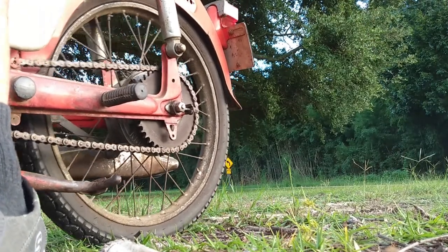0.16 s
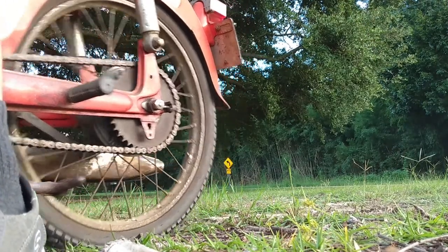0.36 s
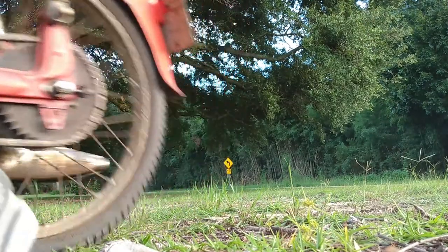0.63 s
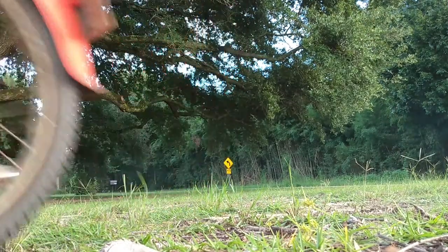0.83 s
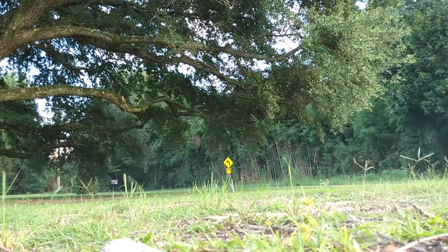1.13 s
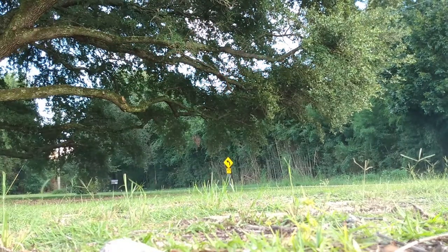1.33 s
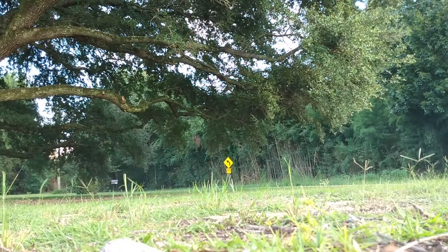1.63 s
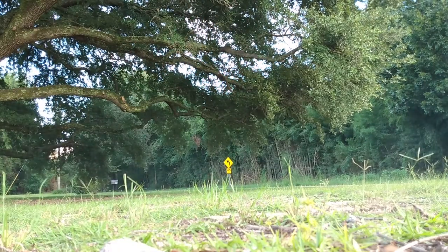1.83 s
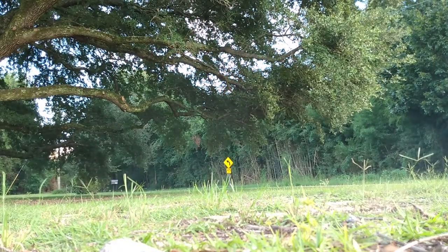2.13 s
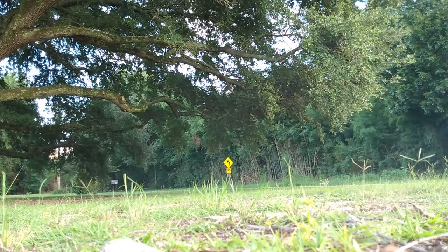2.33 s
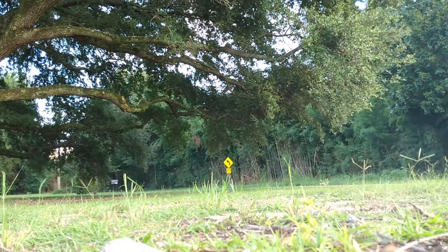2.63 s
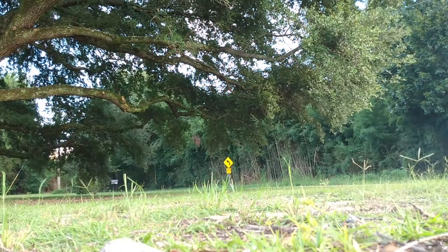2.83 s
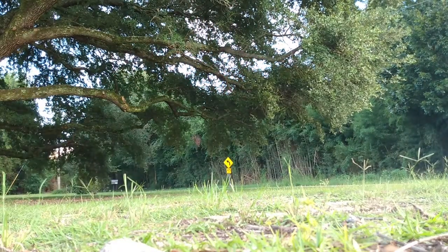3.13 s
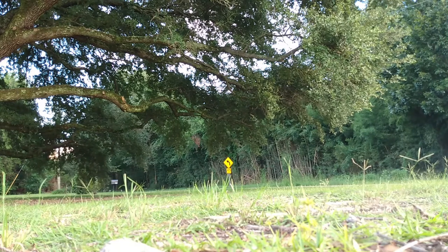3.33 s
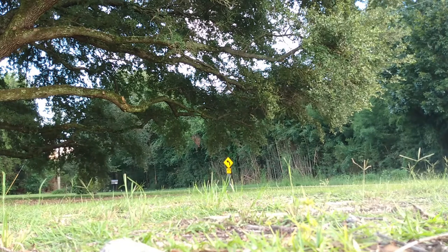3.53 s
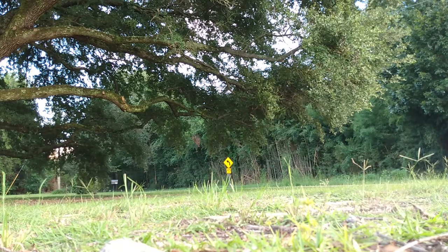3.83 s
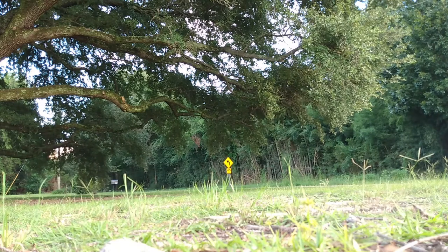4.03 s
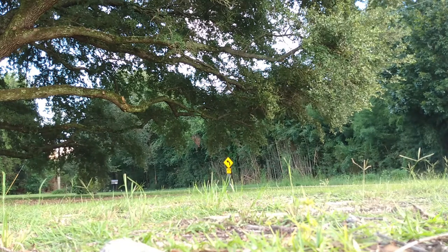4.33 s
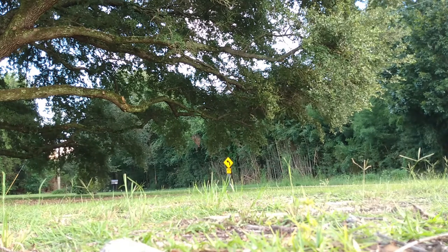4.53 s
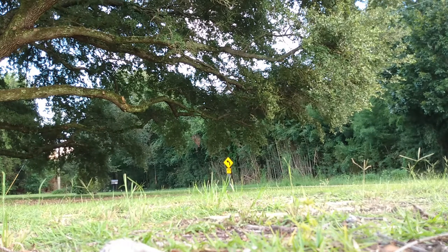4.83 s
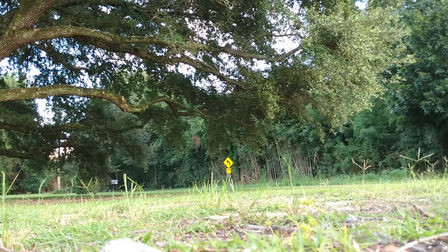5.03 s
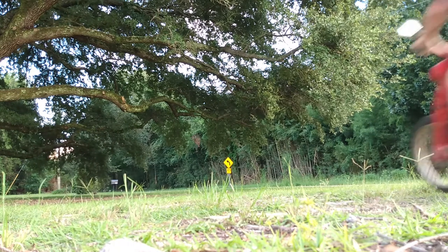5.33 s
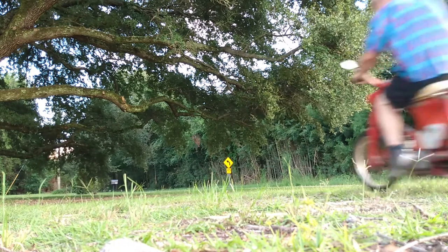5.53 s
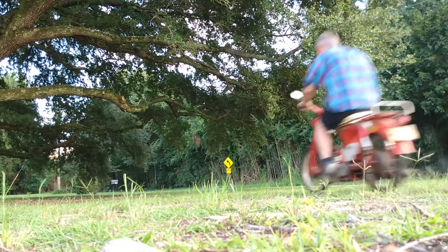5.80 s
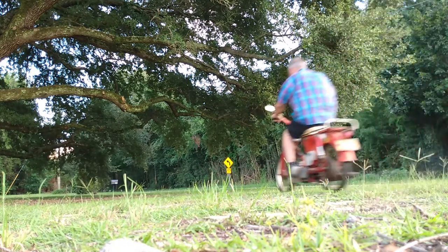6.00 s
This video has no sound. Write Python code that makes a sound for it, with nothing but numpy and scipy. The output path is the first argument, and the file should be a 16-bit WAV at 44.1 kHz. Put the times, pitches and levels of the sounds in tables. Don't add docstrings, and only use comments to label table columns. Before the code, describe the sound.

Outdoors at ground level, a single-cylinder engine chugs very close, its firings quickening into a hollow, buzzing putter as it pulls away. Fin rattle and hissy exhaust thin with distance; a gear whine sings around three seconds, then the throttle drops and the note dulls. A quick cut, and it passes again from the right, loud and rattly, before backfiring in a ragged burst.

```python
import sys
import numpy as np
from scipy import signal
from scipy.fft import rfft, irfft, next_fast_len
from scipy.io import wavfile
from scipy.ndimage import uniform_filter1d, map_coordinates

SR = 44100
rng = np.random.default_rng(int(sys.argv[2]) if len(sys.argv) > 2 else 0)


def unload_audio(sound):
    columns = np.transpose(np.atleast_2d(sound))
    steps = np.round(np.clip(columns, -1, 1) * 32767)
    wavfile.write(sys.argv[1], SR, steps.astype(np.int16))


def magnitude_from_level(level_db):
    exponent = np.asarray(level_db, float) / 20
    return 10 ** exponent


N = 271656
SCENE_CHANGE_S = 4.59


def unit(x):
    return x / np.sqrt(np.mean(x ** 2) + 1e-20)


def steady(x, span_s=0.1045):
    return x / np.sqrt(np.abs(uniform_filter1d(x ** 2, int(span_s * SR))) + 1e-12)


def along(points, hz):
    f, v = np.transpose(points)
    return np.interp(np.log(hz + 1), np.log(f + 1), v)


def curves(rows):
    s, *cols = np.transpose(rows)
    return [np.interp(np.arange(N) / SR, s, c) for c in cols]


def wobble(rate):
    knots = rng.standard_normal(int(N * rate / SR) + 4)
    return map_coordinates(knots, [np.arange(N) * rate / SR])


def filtered(x, response):
    m = next_fast_len(N + SR // 2)
    return irfft(rfft(x, m) * response(np.fft.rfftfreq(m, 1 / SR)), m)[..., :N]


def resonant(x, peaks):
    def bank(f):
        total = 0
        for k, (centre, width, db) in enumerate(peaks):
            peak = 1j * f * width / (centre * centre - f * f + 1j * f * width)
            total = total + (-1) ** k * magnitude_from_level(db) * peak ** 2
        return total
    return unit(filtered(x, bank))


def placed(x, lead_ms, pan_db):
    shift = lead_ms * SR / 2000
    pair = [map_coordinates(x, [np.arange(N) + side * shift], order=3) for side in (1, -1)]
    return np.array(pair) * magnitude_from_level([pan_db / 2, -pan_db / 2])


def facing(pair, centre_hz, width_hz, boost_db, size=256):
    hz, t, z = signal.stft(pair, SR, nperseg=size)
    centre_hz, boost_db = (np.interp(t, np.arange(N) / SR, v + np.zeros(N)) for v in (centre_hz, boost_db))
    near = np.exp(-((hz[:, None] - centre_hz) / width_hz) ** 2)
    return signal.istft(z * magnitude_from_level(boost_db * near), SR, nperseg=size)[1][..., :N]


# time in seconds, firings a second.
LEAVING = [(0, 13.17), (.27, 21.89), (.49, 25.45), (.8, 24.42), (1.02, 25.8), (2.08, 28.63), (2.78, 36.51),
           (2.91, 39.2), (3.06, 40), (3.16, 36.5), (3.73, 45.15), (4.2, 37.25), (4.59, 38.84)]
PASSING = [(4.59, 42.98), (4.79, 40.4), (5.1, 42.6), (5.53, 44.53), (5.73, 43.33), (6.16, 37.49)]


def firing_rate():
    return curves(LEAVING + PASSING)[0]


FIRST_TURN = (.797, .155)


def crank():
    turns = np.zeros(N)
    for rows, first, start in zip((LEAVING, PASSING), FIRST_TURN, (0, int(SCENE_CHANGE_S * SR))):
        turns[start:] = np.ceil(turns[start]) + first + np.cumsum(curves(rows)[0][start:]) / SR
    return np.interp(np.arange(N) + .0049 * SR, np.arange(N), turns)


# time in seconds, throttle opening 0 to 1.
THROTTLE = [(0, .6), (.12, 1), (3.79, 1), (3.87, 0), (4.58, 0), (4.6, 1), (5.79, 1), (5.87, 0)]


def throttle_shut():
    return 1 - curves(THROTTLE)[0]


# time in seconds, how squarely a loaded jet points at the listener 0 to 1.
AIM = [(0, .12), (.9, .2), (1.6, .6), (3, .65), (3.8, .8), (3.86, .1), (4.9, .12), (5.2, .8), (5.79, .95),
       (5.84, .5), (6.16, .5)]


def tailpipe_aim():
    return curves(AIM)[0]


MISFIRES = [3.9, 4.155]
# time in seconds, level in dB.
COASTING = [(5.82, -9), (5.845, 1), (5.867, -5), (5.891, -0.5), (5.915, -0.5), (5.940, -2.5), (5.964, -4.5),
            (5.989, -9), (6.015, -7.5), (6.041, -9.5), (6.066, -13), (6.094, -11.5), (6.122, -16),
            (6.143, -7.5)]


def firings(turns, uneven):
    at = np.flatnonzero(np.diff(np.floor(turns)) > 0)
    luck = rng.standard_normal((len(at), 3))
    late = np.clip(at + (.0012 * SR * uneven[at] * luck[:, 2]).astype(int), 0, N - 1)
    sizes = magnitude_from_level((.3 + 7 * uneven[at]) * luck[:, :2].T)
    coast_s, coast_db = np.transpose(COASTING)
    loaded = late < (coast_s[0] - .012) * SR
    late = np.r_[late[loaded], (coast_s * SR).astype(int)]
    blows = np.zeros((2, N))
    blows[:, late] = np.c_[sizes[:, loaded], [magnitude_from_level(coast_db - coast_db.mean())] * 2]
    for s in MISFIRES:
        blows[:, late[np.argmin(np.abs(late / SR - s))]] *= .35
    return late, blows


def chamber(at, size, modes, note_hz, t60, left, swell_s, crest_s):
    now, left = np.arange(N), np.clip(left, 0, 1)
    last = np.searchsorted(at, now, side="right") - 1
    swell = 1 - np.exp(-((now - at[last.clip(0)]) / SR / swell_s) ** 2)
    out = 0
    for back, gain in enumerate((swell, 1 - swell * (1 - left), left * (1 - swell))):
        k = (last - back).clip(0)
        age, born = np.abs(now - at[k]) / SR, at[k]
        tone = 0
        for share, db, life in modes:
            decay = magnitude_from_level(db - 60 * age / (life * t60[born]))
            tone = tone + decay * np.cos(2 * np.pi * share * note_hz[born] * (age - crest_s[born]))
        out = out + (last >= back) * gain * size[k] * tone
    return steady(out)


# share of its note, level in dB, share of its t60.
BOOM = [(.8, -10, 0.89), (1.004, 12, 1), (1.38, -38, 0.26)]
# time in seconds, note in Hz, t60 in seconds,
# share of the last ring that outlives the next firing.
CHAMBER = [(0, 234, 0.17, .2), (.4, 245.7, 0.2, 0.18), (1.2, 252.4, 0.13, 0.18), (2, 260.5, 0.12, .2),
           (2.7, 259.6, 0.14, 0.13), (3.3, 259, 0.083, .1), (3.8, 265, 0.21, 0.17),
           (3.95, 250, 0.21, 0.097), (4.2, 232, 0.09, .1), (4.58, 219, 0.06, .1), (4.6, 256.5, 0.4, 0.4),
           (5.2, 262.4, 0.12, 0.29), (5.79, 262, 0.22, 0.31), (5.85, 245, 0.056, .05),
           (6.16, 241, 0.026, .05)]


def silencer_boom(at, blows, uneven):
    aim = tailpipe_aim()
    swell_s = .003 * (1 - .6 * aim) * np.interp(uneven, [.2, .5], [.9, .12])
    detour_s = np.interp(aim, [.2, .45], [.001, 0])
    crest_s = .0053 - .00004 * np.clip(firing_rate() - 30, 0, None) + detour_s
    return chamber(at, blows[at], BOOM, *curves(CHAMBER), swell_s, crest_s)


# time in seconds, lower note in Hz, its dB over boom, upper note in Hz, its dB over boom.
LOW_NOTES = [(0, 342, -12, 465, -13), (.3, 384, -19.5, 479, -13), (.8, 372.4, -14, 444, -18.5),
             (1.05, 384, -17, 478, -12), (1.3, 380, -19, 478, -7), (2, 370, -9, 466, -15.5),
             (2.4, 394, -10.5, 489, -2.5), (2.8, 404, -14, 512, -6.5), (3.1, 395, -18, 507, -8.5),
             (3.7, 399, -20, 525, -13.5), (3.9, 390, -18, 481, -14.5), (4.58, 372, -8.5, 473, -29),
             (4.6, 378, -19, 440, -26), (5, 393, -7, 500, -5), (5.4, 427, -17, 530, -5),
             (5.79, 399, -10, 537, -11), (6.16, 395, 0.5, 535, -16)]
# time in seconds, lower note in Hz, its dB over boom, upper note in Hz, its dB over boom.
HIGH_NOTES = [(0, 550, -30, 690, -30), (.3, 520, -13, 690, -12.5), (.7, 590, -26.5, 735, -19),
              (1.3, 570, -50, 698, -17.5), (1.9, 568, -20, 688, -9), (2.5, 526, -35, 685, -11),
              (3, 520, -18, 725, -20), (3.4, 524, -16, 714, -23), (3.75, 554, -12, 740, -20),
              (4, 514, -19, 700, -34), (4.58, 530, -26, 720, -23), (4.6, 567, -9, 660, -31),
              (4.9, 578, -15, 700, -12), (5.2, 528, -14.5, 724, -19), (5.5, 614, -15.5, 742, -8.5),
              (5.79, 580, -8, 740, -4), (5.85, 590, -20, 780, -13), (6.16, 590, -12, 780, -9)]


def pipe_notes(at, blows):
    aim = tailpipe_aim()
    swell_s = np.interp(aim, [.3, .6], (.0022, .0005))
    crest_s = np.interp(aim, [.3, .6], (.0054, .0006))
    notes = curves(LOW_NOTES) + curves(HIGH_NOTES)
    out = 0
    for hz, db, t60_s in zip(notes[::2], notes[1::2], (.22, .22, .085, .085)):
        drifting_hz = hz * (1 + .007 * wobble(12))
        life_s = t60_s * np.interp(aim, [.2, .5], [.5, 1])
        out = out + magnitude_from_level(db) * chamber(at, blows[at], [(0.95, 0, 1)], drifting_hz, life_s, .13, swell_s, crest_s)
    return out


# time in seconds, heat from cool -1 to hot 1.
HEAT = [(0, -1.1), (.4, -0.047), (2, -0.21), (3.8, -0.12), (3.95, -0.22), (4.2, -0.73), (4.58, -0.35),
        (4.6, -0.41), (5.8, 1), (5.9, -2.8), (6.16, -1.1)]


def ring(blows, modes, swell_s, crest_s, heat_drift=0):
    heat = np.clip(np.clip(curves(HEAT)[0], -1, 1) + heat_drift, -1, 1)
    t = np.arange(SR // 6) / SR
    out = 0
    for warmth, scale in ((-0.79, 0.98), (-0.71, 1.1), (1.0, 1.059)):
        shape = sum(magnitude_from_level(db - 60 * t / t60) * np.cos(2 * np.pi * hz * scale * (t - crest_s)) for hz, db, t60 in modes)
        part = np.clip(1 - np.abs(heat - warmth), 0, 1)
        out = out + signal.fftconvolve(blows * part, shape * (1 - np.exp(-(t / swell_s) ** 2)))[:N]
    return steady(out)


# mode in Hz, level in dB, t60 in seconds.
THUD = [(120, -5, 0.021), (142.2, 31, 0.062)]
# time in seconds, level in dB.
BREATH = [(0, 3), (.4, -1.5), (1.2, 1), (1.8, -1.5), (2.5, -2.5), (3.3, -12), (3.8, -2), (3.95, -6),
          (4.1, -0.5), (4.58, 0.5), (4.62, -4), (5, 13.5), (5.5, -1), (5.78, -7), (5.86, 5), (6.16, 1)]


def pipe_thud(blows):
    shut = throttle_shut()
    swallowed_db = 6.5 * tailpipe_aim() * (1 - shut) * np.clip(firing_rate() - 28.2, 0, None)
    level_db = np.maximum(-0.5 - swallowed_db, -14) + 3.5 * shut + curves(BREATH)[0]
    thud = filtered(ring(blows, THUD, .003, .005), lambda hz: (1j * hz / (100 + 1j * hz)) ** 3)
    return magnitude_from_level(level_db) * thud


def slug(blows, push_s, suck_s):
    t = np.arange(SR // 100) / SR - 2 * push_s
    push = -t / push_s ** 2 * np.exp(-(t / push_s) ** 2)
    suck = -t / suck_s ** 2 * np.exp(-(t / suck_s) ** 2)
    return signal.fftconvolve(blows, np.where(t < 0, push, suck))[:N]


# mode in Hz, level in dB, t60 in seconds.
OVERTONES = [(489, 12, 0.019), (690, 5, 0.046), (800, -5.5, 0.074), (991, -0.5, 0.076)]
# delay in ms, level in dB.
ECHOES = [
    (-5.2, -4),
    (-.5, -2),
    (3.9, 0),
    (7.6, -5),
    (11.4, -9),
]


def tailpipe(turns, blows, uneven):
    aim = tailpipe_aim()
    gas = np.exp(-(turns % 1) / .5) * rng.standard_normal(N)
    overtones = ring(blows + (.014 + .06 * uneven) * gas, OVERTONES, .005, .0053, heat_drift=.3 * wobble(5))
    returns = sum(magnitude_from_level(db) * np.roll(blows, int(ms * SR / 1000)) for ms, db in ECHOES)
    echoes = steady(slug(returns, push_s=0.001038, suck_s=0.00063))
    front = steady(slug(blows, push_s=.00055, suck_s=.00055))
    return magnitude_from_level(-6 - 11.2 * aim) * overtones + magnitude_from_level(-4) * (1 - aim) * echoes + magnitude_from_level(2.0) * aim * front


# time in seconds, intake roar in dB, distance in metres,
# jet turned to the listener 0 to 1.
GEAR = [(0, -25.5, 1.15, 0.34), (.25, -23.5, 1.02, 0.51), (.55, -22, 1.1, 0.99), (.85, -21.5, 0.99, 0.8),
        (1.2, -22.5, 1.5, 0.74), (1.7, -26, 2.44, 1), (2.3, -26, 4.36, 0.65), (2.85, -26, 6.9, 0.7),
        (3.2, -26.5, 5.8, 0.62), (3.68, -25.5, 3.9, 0.82), (3.9, -29.5, 6.2, 0.63),
        (4.2, -34.5, 12.4, 0.07), (4.58, -33.5, 38, 0), (4.6, -25.5, 1.9, 0.13), (4.92, -25.5, 1.01, 0.09),
        (5.35, -17.5, 1, 0.57), (5.55, -19.5, 2.3, 0.93), (6.16, -23, 1.8, 0.63)]
# time in seconds, level in dB.
EXHAUST = [(0, -21.5), (.12, -16.5), (.55, -12), (1.5, -13), (2.5, -16.5), (3, -17.5), (3.3, -18),
           (3.5, -20), (3.65, -20), (3.8, -21), (4.16, -22), (4.58, -22), (4.6, -17.5), (4.8, -18.5),
           (5.35, -18.5), (5.5, -17.5), (5.8, -18.5), (6.16, -24.5)]


def exhaust(turns, uneven):
    rate, shut, metres = firing_rate(), throttle_shut(), curves(GEAR)[1]
    at, (boom_blows, pipe_blows) = firings(turns, uneven)
    level_db = curves(EXHAUST)[0] - 2.5 * shut
    pipe_db = -4 - 3 * shut + 3.5 * uneven - 0.006 * metres
    hum_db = -17.5 + .5 * (rate - 25) - 4 * shut
    boom = silencer_boom(at, boom_blows, uneven) + pipe_notes(at, pipe_blows)
    pipe = magnitude_from_level(pipe_db) * tailpipe(turns, pipe_blows, uneven)
    hum = magnitude_from_level(hum_db) * np.sin(2 * np.pi * 2 * turns)
    return magnitude_from_level(level_db) * (boom + pipe_thud(boom_blows) + pipe + hum)


# time in seconds, centre in Hz, level in dB.
GROUND = [(0, 1200, -17), (1, 1070, -8), (1.4, 840, -5), (2.4, 657, -13), (3.4, 776, -13), (3.8, 870, -5.5),
          (4.58, 700, -7), (4.6, 670, -1), (5.2, 890, -1.5), (6.16, 940, -3)]


def over_grass(pipe):
    fast = np.clip(firing_rate() / 10 - 3, 0, 1)
    dip_hz, dip_db = curves(GROUND)
    pipe = facing(pipe, dip_hz, width_hz=185, boost_db=dip_db, size=512)
    pipe = facing(pipe, 301, width_hz=48, boost_db=3.5 * fast, size=1024)
    return facing(pipe, 172.5, width_hz=36, boost_db=-3.5 * fast, size=1024)


def habit(turns, size=400):
    table = uniform_filter1d(rng.standard_normal((int(turns[-1]) + 2, size)), size=7, axis=0)
    return unit(map_coordinates(table, [turns, turns % 1 * size], order=1, mode="grid-wrap")) * 1.6


def patchy(pair):
    z = signal.stft(pair, nperseg=512)[2]
    gains = uniform_filter1d(rng.standard_normal(z.shape[1:]), size=3, axis=0)
    gains = uniform_filter1d(gains, size=30, axis=1)
    return signal.istft(z * magnitude_from_level(1.8 * unit(gains)), nperseg=512)[1][:, :N]


# time in seconds, centre in Hz, length
# in seconds, level in dB.
GLINTS = [(.15, 2930, 0.14, 5.5), (.15, 3820, 0.46, 10.5), (0.44, 3130, 0.15, 7), (0.452, 3750, 0.2, 3),
          (0.504, 4570, 0.6, 6.5), (0.842, 4100, 0.13, 9.5), (0.81, 3300, 0.25, 6), (1.3, 2970, 1, 2.5),
          (2.088, 2600, 1, 12.5), (3.5, 2500, 0.099, 0), (4.693, 2580, 0.11, 6), (4.822, 3600, .07, 5),
          (4.86, 4540, 0.042, 9), (4.917, 4100, .03, 8), (5.026, 2330, 0.19, 15), (5.098, 2800, 0.16, 7.5),
          (5.252, 2600, 0.046, 6), (5.4, 3400, 0.068, 7), (5.53, 3310, 0.16, 12), (5.677, 2790, 0.14, 15),
          (5.883, 2250, 0.14, 4), (1.25, 1810, 0.24, 0.5), (1.904, 1970, 0.41, 5.5),
          (2.1, 1670, 0.077, 2.5), (2.398, 1330, 0.099, -1), (1.4, 1130, 0.13, -1), (2.698, 1010, 1, 7),
          (5.94, 1240, 0.27, -7), (0.536, 1950, 0.1, -5), (3.4, 850, 0.25, -5), (4.35, 3700, 0.28, 11),
          (4.35, 4700, 0.31, 7), (3.646, 1500, .2, 3), (5.063, 880, 0.086, 8), (6.04, 2230, 0.059, 12)]


def glinting(pair, size=256):
    hz, t, z = signal.stft(pair, SR, nperseg=size)
    boost_db = 0
    for s, centre_hz, length, db in GLINTS:
        band = ((hz[:, None] - centre_hz) / 200) ** 2
        boost_db = boost_db + db * np.exp(-band - ((t - s) / length) ** 2)
    return signal.istft(z * magnitude_from_level(boost_db), SR, nperseg=size)[1][..., :N]


# centre in Hz, width in Hz, level in dB.
INTAKE = [(945, 764, 21.5), (1466, 1130, 14), (2108, 854, 12.5)]
FINS = [(2600, 680, 4.5), (2960, 410, 9), (3570, 880, 12.5), (4330, 800, 5), (4670, 320, 11)]
HISS = [(5630, 2700, 8), (7840, 3700, 4), (9910, 2330, 8), (12830, 2200, 3), (15400, 860, -1)]
REPEATS = (.75, .4, 0)
# time in seconds, crack out of the hiss, rattle of the fins.
CRACK = [(0, 1, 0.67), (.5, 2.6, 0.65), (.9, 3.3, 1), (1.2, 4.2, 0.74), (1.8, 12, 2.2), (2.3, 2.6, 4.8),
         (2.9, 0.57, 1), (3.8, 0.44, 0.57), (4.58, .5, .5), (4.62, 0.46, 0.92), (5.2, 0.68, 1.8),
         (5.45, 1, 3), (5.8, 0.84, 1.2), (6.16, 2, 1)]


def running_gear(turns, lead_ms, pan_db):
    roar_db, metres, jet = curves(GEAR)
    rate, shut = firing_rate(), throttle_shut()
    clatter_db = -27 - 20 * np.log10(metres + 0.016) - 2.5 * shut
    hiss_db = clatter_db - 10.5 + 4 * jet + 0.07 * shut * metres
    share = np.clip(jet, 0, 1) * np.clip((37 - rate) / 7, .65, 1)
    cycle = turns % 1
    size = magnitude_from_level(1.45 * rng.standard_normal(int(turns[-1]) + 2))[turns.astype(int)]
    puff = size * np.exp(-cycle / 0.22)
    valves = np.exp(-((cycle - .3) % 1) / 1.5) + np.exp(-((cycle - .86) % 1) / 0.029)
    knock = np.diff(np.floor(turns + .12), prepend=0) > 0
    crack, rattle = np.abs(curves(CRACK)) * size * np.exp(-cycle / .06)
    intake_beat = .5 + 0.51 * rattle + (1.3 + 1.2 * share) * puff + 2.14 * valves
    fin_beat = 0.64 + 3.85 * share * puff + rattle + valves
    jet_beat = .5 + 2 * share * puff + crack + 0.9 * valves
    same = habit(turns)
    layers = ((roar_db - 3.5, INTAKE, .9, 30, intake_beat),
              (clatter_db - 5.5, FINS, .65, 16, fin_beat),
              (hiss_db - 0.5, HISS, .4, 4, jet_beat))
    out = 0
    for repeats, (level_db, peaks, alike, snap, beat) in zip(REPEATS, layers):
        beat = beat * magnitude_from_level(1.66 * wobble(150) + 0.31 * wobble(16))

        def voice(part):
            noise = np.sqrt(1 - part) * rng.standard_normal(N) + np.sqrt(part) * same
            return steady(resonant(beat * noise + .5 * snap * knock, peaks))
        common = placed(voice(repeats), lead_ms, pan_db)
        apart = np.array([voice(0), voice(0)])
        out = out + magnitude_from_level(level_db) * (np.sqrt(alike) * common + np.sqrt(1 - alike) * apart)
    out = facing(out, 1200, width_hz=67, boost_db=1.5)
    shade_db = np.clip(0.12 * (hiss_db + 69.0) - 19 * (1 - jet), -25, 0)
    out = facing(out, 11740, width_hz=2970, boost_db=shade_db)
    out = facing(out, 17500, width_hz=1400, boost_db=-0.5 * np.clip(metres, 0, 8))
    return glinting(patchy(out))


def trees(x):
    t = np.arange(SR // 4) / SR
    scatter = rng.standard_normal((2, len(t))) + 1.75 * rng.standard_normal(len(t))
    tail = scatter * magnitude_from_level(-60 * t / 1.0) * (t > .006)
    return signal.fftconvolve(x[None], tail / np.linalg.norm(tail[0]), axes=1)[:, :N]


# frequency in Hz, level in dB per Hz.
FIELD = [(12, -74), (20, -61), (225, -31), (404, 3.5), (811, -16.5), (1200, -55), (5230, -66),
         (7110, -23.5), (15500, -123)]


def field():
    air = unit(filtered(rng.standard_normal((2, N)), lambda hz: magnitude_from_level(along(FIELD, hz))))
    shaking = rng.standard_normal((2, N)) + 1.9 * rng.standard_normal(N)
    rumble = unit(filtered(shaking, lambda hz: 1 / (1 + (hz / 45) ** 4)))
    rumble = rumble / np.sqrt(curves(GEAR)[1])
    return magnitude_from_level(-37.5 + 0.5 * wobble(5.9)) * air + magnitude_from_level(-28 + 2.5 * wobble(3.44)) * rumble


# time in seconds, level in dB.
LOW_GEAR = [(1.05, -55), (1.2, -31), (1.38, -26), (1.55, -33), (1.8, -55)]
# time in seconds, level in dB.
WHINE = [(1.9, -55), (2.15, -37), (2.75, -38), (2.86, -28), (3.04, -27), (3.1, -20), (3.18, -23),
         (3.3, -31), (3.7, -55)]


def whine(turns):
    out = 0
    for rows, teeth in ((WHINE, 30), (LOW_GEAR, 41.5)):
        level = magnitude_from_level(curves(rows)[0] + 1.5 * wobble(30))
        out = out + level * np.sin(2 * np.pi * teeth * turns + .5 * wobble(40))
    return out


# time in seconds, level in dB, ring in Hz, spit in dB.
POPS = [
    (5.824, -31, 824, -31),
    (5.866, -11.5, 688, -43),
    (5.895, -17.5, 1035, -29),
    (6.014, -22.5, 870, -2),
    (6.031, -13, 800, -21),
    (6.048, -12, 585, -18),
    (6.06, -17.5, 800, -26),
    (6.092, -15.5, 697, -36),
    (6.125, -19, 700, -28),
]
# time in seconds, level in dB, ring in Hz.
CRACKLE = [(5.828, -21, 1470), (5.875, -22, 1400), (5.9006, -9, 1430), (5.9236, -23, 1460),
           (5.9465, -16, 1750), (5.9715, -19.5, 1300), (5.997, -20, 1900), (6.0143, -14, 1790),
           (6.0493, -12, 1450), (6.0712, -28, 1430), (6.0987, -21, 1340), (6.1236, -22, 1460)]


def pops():
    out, t = np.zeros(N + SR), np.arange(SR // 20) / SR
    for s, db, hz, spit_db in POPS:
        jitter = hz / 9000 * np.cumsum(rng.standard_normal(len(t)))
        bang = magnitude_from_level(-60 * t * hz / 45) * np.sin(2 * np.pi * hz * t + jitter)
        spit = magnitude_from_level(spit_db - 60 * t / 0.014) * np.diff(rng.standard_normal(len(t) + 1))
        out[round(s * SR):][:len(t)] += magnitude_from_level(db) * (bang + spit)
    for s, db, hz in CRACKLE:
        jitter = 0.19 * np.cumsum(rng.standard_normal(len(t)))
        spark = magnitude_from_level(db + 1 - 60 * t * hz / 18) * np.sin(2 * np.pi * hz * t + jitter)
        out[round(s * SR):][:len(t)] += spark
    return out[:N]


# time in seconds, unevenness 0 to 1.
UNEVEN = [(0, .16), (.4, .09), (1.2, .07), (3.8, .06), (3.88, .3), (3.98, .18), (4.18, .18), (4.24, .07),
          (4.58, .07), (4.62, .08), (5.79, .07), (5.83, .5), (6.16, .55)]
# time in seconds, left lead of the tailpipe in ms, left lead of the engine in ms,
# left over right in dB.
BEARING = [(0, 0.11, 0.367, -1), (.6, 0.096, 0.413, -2.5), (1, 0.17, 0.46, -1.5), (1.4, 0.47, 0.56, -0.5),
           (1.8, 0.59, 0.51, 0.6), (4.58, 0.48, 0.63, -0.5), (4.6, -0.31, -0.417, 0),
           (5, -0.44, -0.4, -2.5), (5.4, -0.27, -0.352, -3), (5.8, -0.13, -0.118, -1),
           (6.16, 0.026, -0.085, -3)]


def scene():
    turns, (uneven,) = crank(), curves(UNEVEN)
    pipe_ms, engine_ms, pan_db = curves(BEARING)
    pipe = over_grass(exhaust(turns, uneven)) + pops()
    bike = placed(pipe, pipe_ms, pan_db)
    bike = bike + placed(whine(turns), engine_ms, pan_db) + running_gear(turns, engine_ms, pan_db)
    return bike + magnitude_from_level(-13.5) * trees(pipe) + field()


# frequency in Hz, level over the right in dB.
LEFT_PORT = [(300, 1.5), (700, -.5), (1300, 5), (2400, 10.5), (4400, 4), (8000, 6), (15000, 8)]


def low_pass(x):
    return signal.sosfilt(signal.butter(12, 15950, fs=SR, output="sos"), x)


def record(dry):
    def ports(hz):
        bass_cut = (1j * hz / (60 + 1j * hz)) ** 3
        return magnitude_from_level(along(LEFT_PORT, hz) * [[.5], [-.5]]) * bass_cut * (hz < 15950)
    gap = np.arange(N) / SR - SCENE_CHANGE_S
    dip = np.clip(np.where(gap < 0, -gap / 0.031, gap / 0.035), 0, 1) ** 2.04
    x = filtered(dry, ports) * dip
    x = x / (1 + np.abs(x / .97) ** 6) ** (1 / 6)
    return low_pass(x)


dry = scene()
out = record(dry)
unload_audio(out)
```